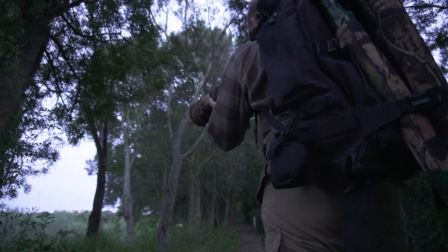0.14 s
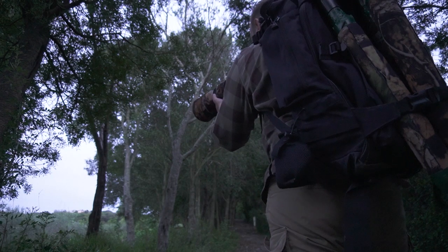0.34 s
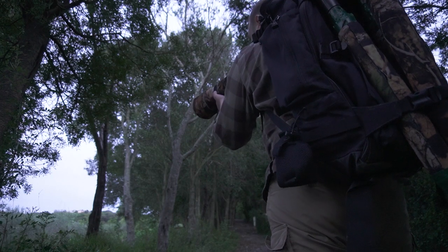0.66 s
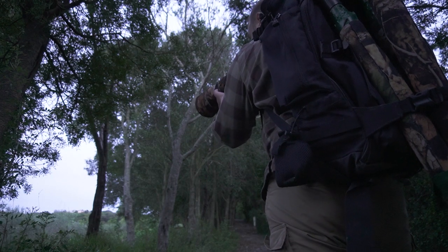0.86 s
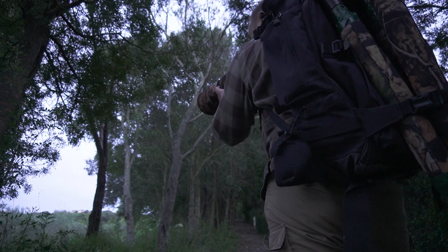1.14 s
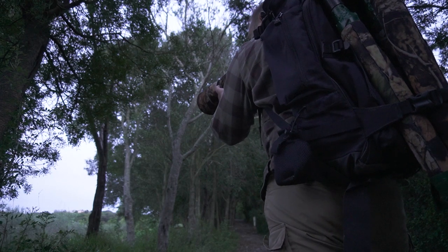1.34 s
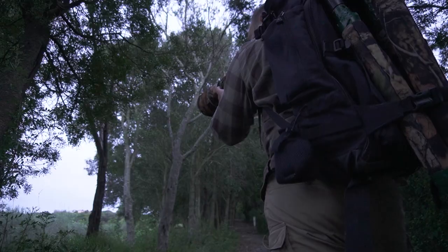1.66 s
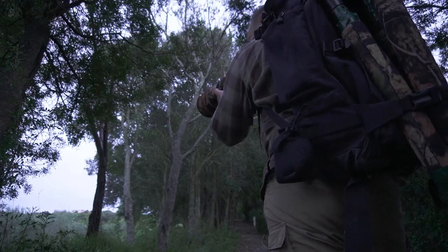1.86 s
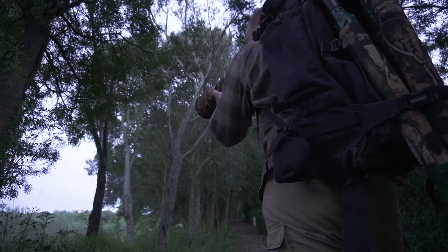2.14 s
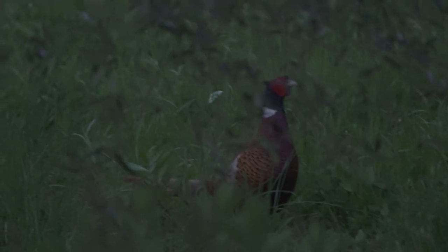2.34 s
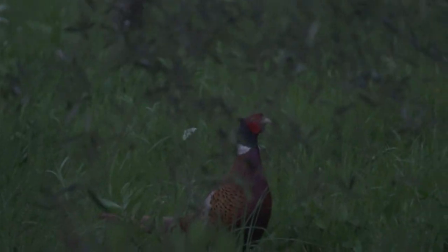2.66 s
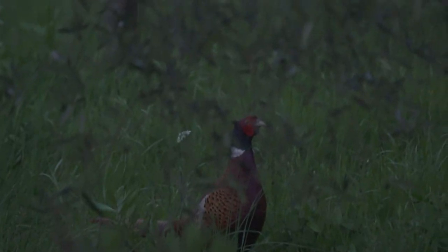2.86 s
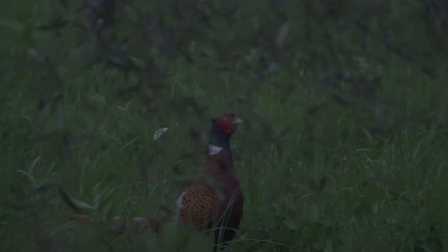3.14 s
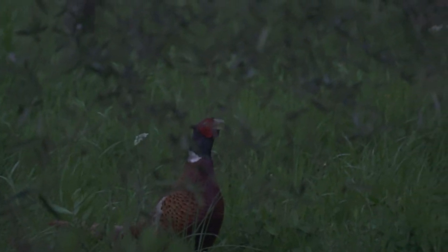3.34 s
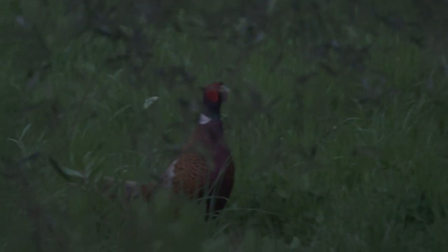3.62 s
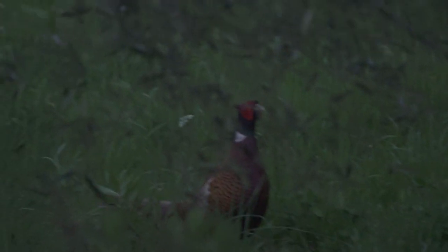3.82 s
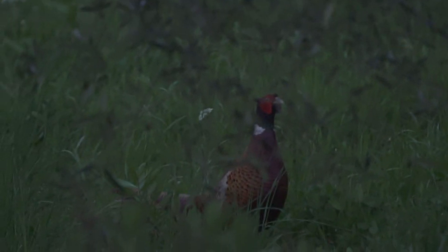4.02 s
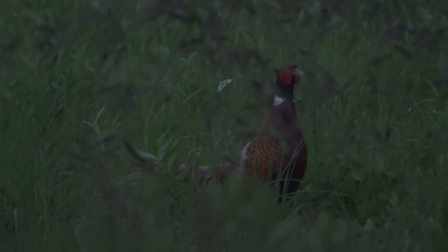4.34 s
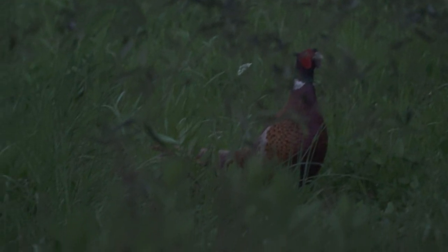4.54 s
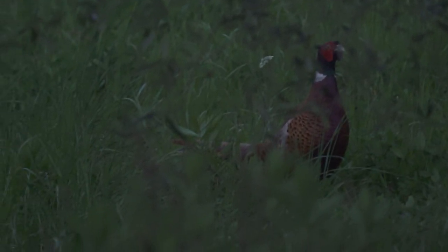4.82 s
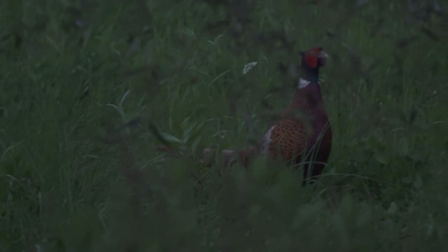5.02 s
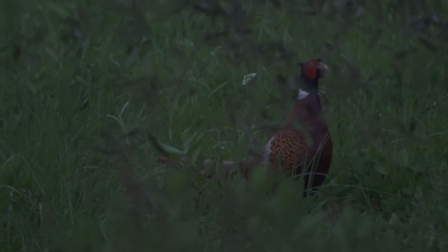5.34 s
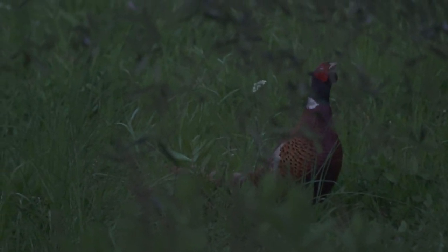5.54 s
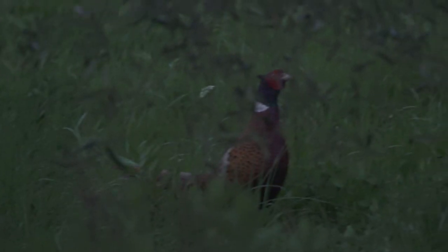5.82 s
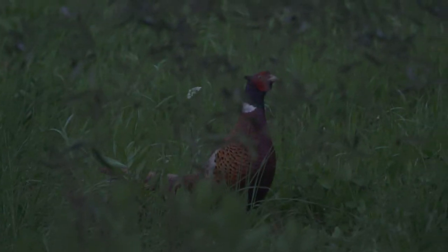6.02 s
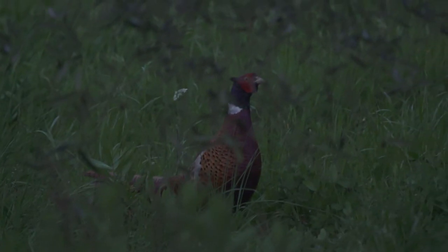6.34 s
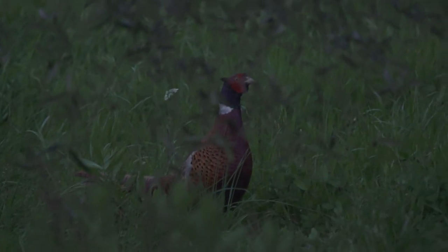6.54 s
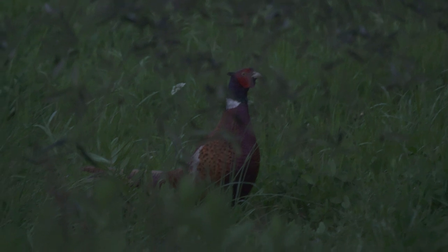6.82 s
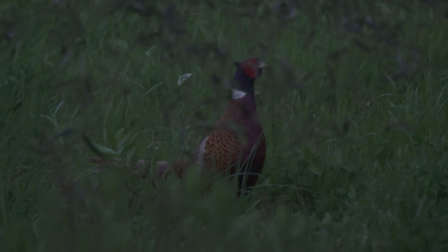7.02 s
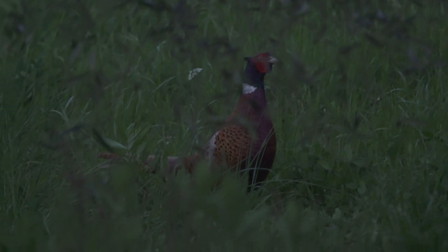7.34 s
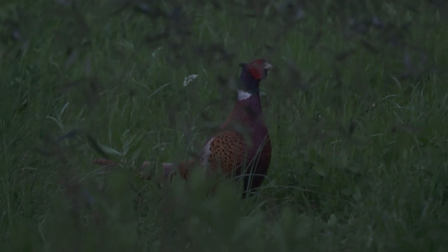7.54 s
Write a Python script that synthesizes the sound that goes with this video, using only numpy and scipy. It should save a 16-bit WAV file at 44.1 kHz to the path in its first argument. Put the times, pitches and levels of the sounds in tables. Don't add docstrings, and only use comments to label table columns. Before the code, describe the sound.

A walker's pack rubs, knocks and clicks close to the microphone for half a second, with a sharp snap and later buckle taps. A pheasant in a meadow gives an abrupt harsh two-beat squawk at about one second, then twice more, each echoing from nearby trees. Far songbirds whistle and flute; a nearer one chatters midway. Quiet air and hiss lie beneath.

```python
import sys
import numpy as np
from scipy import signal
from scipy.fft import rfft, irfft, next_fast_len
from scipy.io import wavfile

SR = 44100
rng = np.random.default_rng(int(sys.argv[2]) if len(sys.argv) > 2 else 0)


def wrap_up_sound(samples):
    columns = np.atleast_2d(samples).T
    tamed = np.clip(columns, -1, 1)
    steps = np.round(tamed * 32767).astype(np.int16)
    wavfile.write(sys.argv[1], SR, steps)


def rack_gain(trim_db):
    fader = np.asarray(trim_db, float)
    return 10 ** (fader / 20)


N = 338247
SCENE_CHANGE_S = 2.335

# freq_hz, level_db (per Hz)
AIR_TONE = [(12, -28.5), (20, 0), (158, -3.5), (222, -4.5), (277, -5), (319, -6), (347, -6), (1330, -14),
            (1710, -19), (1860, -13.5), (2670, -19), (8890, -24.5), (16000, -25.5)]
AIR_DB = -58.5
# time_s, level_db
CHORUS_LEVEL = [(0, -63), (1.499, -66), (2.33, -75.5), (2.34, -95), (3.702, -66), (4.499, -71), (5.5, -66),
                (6.601, -71.5), (7.299, -68), (7.67, -65)]
# freq_hz, t60_s
TREE_DECAY = [(600, 0.59), (1200, 0.52), (2500, 0.39), (4000, 0.29), (5000, .3), (7000, 0.15), (9000, .32),
              (12000, 0.15)]

# start_s, length_s, pitch_hz, level_db
WHISTLES = [(0.85, 0.14, 1290, -70), (0.873, 0.068, 3320, -70), (1.493, 0.065, 1210, -65.5),
            (1.263, 0.1, 2450, -59), (1.43, 0.22, 2910, -71), (1.647, 0.11, 2680, -68),
            (1.701, 0.11, 1746, -65), (2.07, 0.052, 3820, -75), (2.327, 0.022, 3900, -71),
            (3.952, 0.041, 2137, -65.5), (4.098, 0.17, 3170, -75), (4.05, 0.055, 2580, -69),
            (4.191, 0.061, 2100, -67), (4.485, 0.099, 1700, -69), (4.382, 0.036, 2650, -72),
            (4.616, 0.06, 2280, -59), (5.072, 0.21, 2510, -68.5), (5.063, 0.18, 2600, -74),
            (6.03, 0.081, 1333, -67), (6.041, 0.19, 3404, -67.5), (6.354, 0.1, 2026, -65),
            (6.726, 0.25, 3010, -73.5), (6.729, 0.049, 1616, -64), (7.096, 0.031, 3325, -66),
            (7.259, 0.02, 3720, -62.5), (7.283, 0.03, 1600, -77), (7.283, 0.035, 3244, -63),
            (7.56, 0.12, 1800, -70.5)]
# start_s, length_s, start_hz, end_hz, level_db
SLURS = [(1.592, 0.024, 2590, 2150, -61), (1.99, 0.12, 2050, 2000, -68.5), (2.123, 0.13, 3680, 2490, -73),
         (2.16, 0.066, 2050, 1350, -67), (2.3, 0.013, 3380, 3300, -57), (2.306, 0.022, 2980, 1890, -51),
         (4.058, 0.025, 2080, 1830, -67), (6.471, 0.172, 2055, 2100, -72.5), (5.415, .05, 2800, 2300, -65),
         (6.102, 0.15, 2370, 2275, -66.5), (6.196, 0.0266, 3020, 2680, -59),
         (6.236, 0.027, 2784, 2100, -57), (6.677, 0.1, 1720, 2000, -66), (7.492, 0.056, 2850, 3060, -71),
         (7.29, 0.087, 2180, 2280, -70)]
WHISTLE_HUSK_HZ, SLUR_HUSK_HZ_PER_S = 27, 170
# time_s, pitch_hz, level_db
ARCH = [(.875, 1676, -65.5), (.888, 1773, -57.5), (.923, 1753, -57), (.95, 1900, -57), (1.0, 1988, -59.5),
        (1.04, 1900, -58.5), (1.077, 1794, -56.5), (1.115, 1680, -58)]
TRILL_S, TRILL_HZ, TRILL_DEPTH_HZ = .928, 131, 130
# time_s, pitch_hz, level_db
WARBLE = [(1.647, 2490, -64), (1.68, 2300, -63), (1.716, 1880, -71), (1.77, 2107, -66), (1.805, 2360, -57),
          (1.872, 2100, -62), (1.915, 2324, -55), (1.945, 2387, -67), (1.99, 2126, -66)]
# time_s, pitch_hz, level_db
FIGURES = [
    [(2.09, 2720, -64), (2.115, 2780, -61), (2.125, 2700, -64), (2.145, 2617, -52.5), (2.17, 2580, -80),
     (2.195, 2520, -58), (2.225, 2650, -77), (2.25, 2670, -64), (2.3, 2715, -61)],
    [(4.078, 3200, -63), (4.105, 3090, -55.5), (4.128, 2710, -61)],
    [(4.455, 1260, -71), (4.478, 1740, -61), (4.52, 1270, -72)],
    [(4.74, 2550, -69), (4.77, 2280, -63), (4.815, 2060, -62)],
    [(6.83, 2467, -68), (6.9, 2372, -61), (6.965, 2115, -62), (7.03, 2060, -65), (7.1, 2275, -70),
     (7.18, 2246, -65), (7.23, 2140, -62)],
    [(7.225, 2080, -64), (7.265, 1696, -63), (7.33, 1640, -79)],
]
FIGURE_TRILL_HZ = [.1, .1, .1, .1, 110, .1]
FLUTE_ECHO_DB = -5.5

# start_s, start_hz, end_hz, level_db
FLOURISH = [
    (4.576, 4280, 3900, -68),
    (4.61, 4160, 3360, -72),
    (4.63, 3110, 2744, -58),
    (4.65, 3900, 3360, -62),
]
CHIRP_S, CHIRP_GAP_S, SLOWING_S, ANSWER_S = 4.593, .154, .0012, .058
# start_hz, end_hz
FALL_HZ = (3057, 2800)
FALL_DB = [-55.5, -59, -58.5, -62, -58.5, -62, -63.5]
RISE_HZ = 1390
# end_hz, level_db
ANSWERS = [
    (2300, -57),
    (2420, -54.5),
    (2180, -58),
    (2100, -59.5),
    (1980, -62.5),
]

# time_s, level_db
CLOTH_LEVEL = [(0, -55.5), (.135, -53), (.15, -45.5), (.21, -45), (.32, -57.5), (.39, -57), (.51, -61),
               (.8, -63.5), (2.301, -72)]
# freq_hz, level_db (per Hz)
CLOTH_TONE = [(59, -59), (100, -13), (300, -1.5), (576, 0), (1340, -1), (1880, -2.5), (8770, -12.5),
              (15500, -24)]
# start_s, peak_db, ring_hz, tick_db (bright tick against the ring)
CLICKS = [(0.029, -28.5, 5000, -14), (0.052, -34, 2470, -10), (0.073, -34, 905, -9),
          (0.1695, -30, 2700, -2), (0.192, -29, 1500, -5), (0.2214, -37, 5930, 4), (0.254, -41, 2500, -1),
          (.38, -37, 1290, -12), (0.395, -34, 2000, -10), (0.4871, -16, 1690, -23),
          (0.4872, -25.5, 3220, -12), (0.488, -23, 9600, -16), (.4886, -20.5, 5330, -26),
          (.504, -36, 5600, 3), (0.5228, -37.5, 915, 6), (0.524, -37, 7200, -3), (.641, -54, 9000, 0),
          (.681, -49, 6950, -2), (0.7093, -46, 8000, 0), (0.7193, -45, 10000, 9), (0.966, -46, 5400, -2),
          (.973, -53, 6000, -3), (1.085, -49, 5500, -4), (7.392, -53, 4360, -4), (1.749, -43, 2800, -5),
          (1.976, -45.5, 2300, -4), (1.678, -65, 9000, 14), (2.201, -47, 2440, 1),
          (2.3087, -39.5, 906, -4.5), (2.816, -51, 3010, 8.5), (2.968, -45, 3580, -9),
          (3.285, -56, 4000, 5), (4.588, -34.5, 1960, -24), (4.601, -42, 1910, -15), (4.823, -46, 2050, 3),
          (4.9816, -45, 5200, 0), (7.4173, -50, 3500, 7.5), (.4884, -25, 13500, -12),
          (.5232, -44, 12000, -6)]
# start_s, peak_db, pitch_hz, length_cycles
KNOCKS = [(0.1422, -29, 456, 4.7), (0.155, -36, 680, 6.1), (0.1695, -24, 640, 1.7), (0.178, -30, 242, 1.9),
          (.199, -32, 497, 2.5), (.204, -32, 695, 2.6), (0.211, -18, 654, 2.5), (0.221, -31, 1270, 5.5),
          (.16, -40, 535, 14), (0.185, -32, 1370, 3.2), (0.271, -41.5, 343, 2.9)]
# freq_hz, level_db, t60_s
BUCKLE_MODES = [(425, -14, 0.014), (760, -7, 0.025), (1363, -7, 0.019), (1720, 0, 0.013),
                (2100, -2.5, 0.0068), (2715, -13.5, .006), (3520, -11, .006), (4026, -10.5, 0.0094),
                (6070, -22, .004), (7700, -16, 0.0033)]
# start_s, level_db, hardness_db_per_khz, rim_db (rim modes)
TAPS = [
    (.4875, -30.5, -4, .1),
    (0.777, -34, 1.97, -9),
    (0.944, -36, 2.5, 3),
]

# start_hz, end_hz, level_db
SQUEAKS = [
    (4733, 11000, -48.5),
    (3900, 2400, -32.5),
    (5000, 4400, -22.5),
]
# start_s, length_s, effort_db, low_voice_db (against the effort)
SQUAWKS = [
    [(1.118, 0.018, -16.5, -9), (1.141, 0.024, -25.5, -3.5), (1.172, 0.025, -31.5, -1.5),
     (1.19, .016, -23, -7.5), (1.214, 0.005, -29.5, 2.5)],
    [(3.4435, 0.031, -18.5, -15.5), (3.486, 0.011, -32.5, 6.5), (3.506, 0.0016, -21, -29.5),
     (3.517, 0.0043, -24.5, -3), (3.53, 0.027, -38.5, 1)],
    [(5.627, 0.031, -18, -16), (5.664, 0.018, -28.5, 1), (5.693, 0.00297, -23.5, -8.5),
     (5.706, 0.0076, -29.5, -4), (5.722, 0.017, -38.5, -7.5)],
]
FIRST_HZ = [993.5, 996.4, 1012]
LATER_HZ = [965, 967, 967]
LOW_HZ = [1088, 1107, 1098]
LOW_SAG_HZ_PER_S = [1700, 1900, 1900]
# rise_share, rise_s, sag_share_per_s
SCOOP = [(0.057, 0.0068, 0.15), (0.055, .004, 0.76), (0.119, .007, .7)]
OVERTONES = [0.25, 0.2, 0.77, 0.24, 0.48, 0.15, 0.37, 0.49, 0.52, 0.33, 0.56, 0.47]
MIXED_TONES = [(0, 2), (4, -1), (4, 1), (4, 2)]
MIXED_STRENGTH = [
    [0.37, 0.62, 0.29, .25],
    [0.17, 0.38, 0.38, 0.24],
    [0.17, 0.27, .25, .25],
]
FLUTTER_HZ = [184, 208.5, 279.8]
THROB = [0.57, 0.3, 0.33]
UNEVEN = [.2, 0.55, 0.59]
SWELL_DB = [-4, -3.5, -2.5]
SWELL_S = 0.0086
TIRING_DB_PER_S = -130
DULLING_DB_PER_S = -160
# freq_hz, level_db
WINDPIPE = [(500, -39), (820, -21), (1220, -28), (1700, -15.5), (2400, -17.5), (3480, -5), (3950, -5.5),
            (4150, -14), (5150, -5.5), (5550, -31), (6400, -16.5), (7400, -30.5), (8600, -34),
            (15500, -43.5)]
# freq_hz, level_db
BEAK = [
    [(1050, -0.06), (1300, 5.5), (2900, -2.6), (3500, 0.6), (5300, -0.7), (6400, 0.5), (7600, -3),
     (8800, 1.5)],
    [(1050, -1.26), (1300, 4.5), (2900, -2), (3500, 1.5), (5300, 1), (6400, 2.5), (7700, -4), (8800, -4)],
    [(1050, 0), (1300, 6.5), (2900, -1.5), (3500, -0.5), (5300, 2), (6400, 2), (7600, -4), (8800, -.6)],
]
WHEEZE_DB = [-33, -33, -34.5]
WHEEZE_S, WHEEZE_RISE_S, WHEEZE_FALL_S = 0.14, 0.0066, .02
# freq_hz, level_db
WHEEZE_TONE = [(520, -26.5), (700, -6.5), (1250, -16.5), (1700, -3), (6300, -7.5), (7600, -10.5),
               (13000, -18.5), (15800, -32)]
WHEEZE_BANDS_DB, WHEEZE_BAND_HZ = 1.5, 1950
# after_onset_s, level_db
PUSH = [
    [(0, -5.5), (.02, -2), (.042, -0.5), (.064, -11), (.088, -1), (.105, -7.5), (.14, -16)],
    [(0, -9), (.028, 5), (.05, -0.5), (.07, 3), (.095, -3.5), (.115, -15.5), (.14, -15)],
    [(0, -3.5), (.02, 2.5), (.045, -0.5), (.065, -4), (.09, -2), (.115, -16), (.14, -14)],
]
ECHO_DB = [-9, -6, -4.5]
FAR_DB = [-17.5, -18, -17.5]


def evened(x):
    return x / np.sqrt(np.mean(x ** 2) + 1e-20)


def read(points, hz):
    f, value = np.transpose(points)
    return np.interp(np.log(hz + 1), np.log(f + 1), value)


def add(mix, s, sound):
    part = mix[round(s * SR):][:len(sound)]
    part += sound[:len(part)]


def wander(length, hz):
    b, a = signal.butter(2, hz, fs=SR)
    return evened(signal.lfilter(b, a, rng.standard_normal(length + 4000))[4000:])


def coloured(x, points):
    size = next_fast_len(len(x))
    gain = rack_gain(read(points, np.fft.rfftfreq(size, 1 / SR)))
    return irfft(rfft(x, size) * gain, size)[:len(x)]


def fade(t, length, rise, fall):
    return np.clip(t / rise, 0, 1) * np.clip((length - t) / fall, 0, 1)


def trees(x, slower=1.0, far_db=-22):
    taps = np.zeros(SR)
    at = np.arange(300, SR - 20, 20) + rng.integers(0, 20, (SR - 301) // 20)
    taps[at] = rng.choice([-1., 1.], len(at))
    hz, t, z = signal.stft(taps, SR, nperseg=256)
    fall_db = -60 * t / (slower * read(TREE_DECAY, hz)[:, None])
    near_and_far = rack_gain(fall_db) + rack_gain(far_db + 0.36 * fall_db)
    tail = signal.istft(z * near_and_far, SR, nperseg=256)[1]
    return signal.fftconvolve(x, tail / np.linalg.norm(tail))[:N]


def note(length, start_hz, end_hz, level_db, husky_hz, rise=0.012, fall=0.0033):
    t = np.arange(round(length * SR)) / SR
    hz = start_hz + (end_hz - start_hz) * t / length + husky_hz * wander(15000, 130)[:len(t)]
    tone = np.sin(2 * np.pi * np.cumsum(hz) / SR)
    return rack_gain(level_db) * np.sqrt(2) * tone * fade(t, length, rise, fall)


def air():
    hiss = evened(coloured(rng.standard_normal(N), AIR_TONE))
    return rack_gain(AIR_DB + 0.17 * wander(N, 2.5)) * hiss


def chorus(count=420):
    out = np.zeros(N)
    s, db = np.transpose(CHORUS_LEVEL)
    for when, length, pitch, bend in rng.random((count, 4)):
        hz = 1500 + 1900 * pitch ** 1.5
        whistle = note(.03 + .06 * length, hz, hz * (.8 + .35 * bend), 0, 90)
        add(out, when * (N / SR - .2), whistle)
    return evened(trees(out, 1.0)) * rack_gain(np.interp(np.arange(N) / SR, s, db))


def flute(phrase, husky_hz=25, trill_hz=0):
    s, hz, db = np.transpose(phrase)
    t = np.arange(s[0], s[-1], 1 / SR)
    trill = trill_hz * (t > TRILL_S) * np.sin(2 * np.pi * TRILL_HZ * (t - TRILL_S))
    turns = np.cumsum(np.interp(t, s, hz) + trill + husky_hz * wander(len(t), 120)) / SR
    tone = rack_gain(np.interp(t, s, db)) * np.sqrt(2) * np.sin(2 * np.pi * turns)
    return s[0], tone * fade(t - s[0], s[-1] - s[0], .006, 0.0044)


def chirp(start_hz, end_hz, level_db, length=0.037, settle_s=0.0106, drop_hz=0):
    t = np.arange(round(length * SR)) / SR
    glide = end_hz + (start_hz - end_hz) * np.exp(-t / settle_s) - drop_hz * (t / length) ** 4
    turns = np.cumsum(glide + 75 * wander(len(t), 200)) / SR
    second_tone = np.sin(2 * np.pi * 1.1 * turns + 1.4 * wander(len(t), 370.7))
    tone = np.sin(2 * np.pi * turns) + 0.68 * np.exp(-t / 0.04) * second_tone
    return rack_gain(level_db) * np.sqrt(2) * tone * fade(t, length, .003, .014)


def chatter():
    out = np.zeros(N)
    for s, *row in FLOURISH:
        add(out, s, chirp(*row))
    k = np.arange(len(FALL_DB))
    starts = CHIRP_S + CHIRP_GAP_S * k + SLOWING_S * k * k
    for s, db in zip(starts, FALL_DB):
        add(out, s, chirp(*FALL_HZ, db))
    for s, row in zip(starts[1:], ANSWERS):
        add(out, s + ANSWER_S, chirp(RISE_HZ, *row, length=.045, settle_s=.005, drop_hz=1100))
    return rack_gain(-0.5) * out + rack_gain(-4) * trees(out, 1.1)


def songbirds():
    before, after, near = np.zeros(N), np.zeros(N), np.zeros(N)
    for s, length, hz, db in WHISTLES:
        side = before if s < SCENE_CHANGE_S - .01 else after
        add(side, s, note(length, hz, hz, db, WHISTLE_HUSK_HZ))
    for s, length, *row in SLURS:
        side = before if s < SCENE_CHANGE_S else after
        add(side, s, note(length, *row, SLUR_HUSK_HZ_PER_S * length))
    add(near, *flute(ARCH, 12, TRILL_DEPTH_HZ))
    add(near, *flute(WARBLE, 6.9))
    for figure, trill_hz in zip(FIGURES, FIGURE_TRILL_HZ):
        add(near, *flute(figure, 28, trill_hz))
    gate = np.clip((SCENE_CHANGE_S - np.arange(N) / SR) / 0.011, 0, 1)
    before = gate * (before + rack_gain(-5.0) * trees(before, 1.5))
    after = after + rack_gain(-5.0) * trees(after, 1.47)
    near = near + rack_gain(FLUTE_ECHO_DB) * trees(near, 1.2)
    return before + after + near + chatter()


def cloth():
    s, db = np.transpose(CLOTH_LEVEL)
    size = rack_gain(1.4 * np.minimum(rng.exponential(1, N), 5))
    snaps = size * (rng.random(N) < 2500 / SR) * rng.standard_normal(N)
    rub = coloured(evened(snaps) + 1.4 * rng.standard_normal(N), CLOTH_TONE)
    level_db = np.interp(np.arange(N) / SR, s, db + 3.0, right=-90)
    return evened(rub) * rack_gain(level_db + 1.5 * wander(N, 47))


def buckle():
    out, t = np.zeros(N), np.arange(2000) / SR
    for s, level_db, hard, rim_db in TAPS:
        for hz, db, t60 in BUCKLE_MODES:
            mode_db = level_db + db + hard * hz / 1000 + rim_db * (3000 < hz < 5000)
            add(out, s, rack_gain(mode_db - 60 * t / t60) * np.sin(2 * np.pi * hz * t))
    return out


def pack():
    out, t = np.zeros(N), np.arange(600) / SR
    bright = signal.butter(1, [2500, 9500], "band", fs=SR)
    for s, peak_db, hz, tick_db in CLICKS:
        ring = np.sin(2 * np.pi * hz * t) * np.exp(-t / (0.00022 + 0.71 / hz))
        tick = signal.lfilter(*bright, rng.standard_normal(600)) * 1.46 * np.exp(-t / 0.0005)
        add(out, s, rack_gain(peak_db) * (1.2 * ring + rack_gain(tick_db) * tick))
    out = signal.sosfilt(signal.butter(2, 350, "high", fs=SR, output="sos"), out)
    for s, peak_db, hz, cycles in KNOCKS:
        u = np.arange(round(cycles / hz * SR)) / SR
        swell = np.sin(np.pi * (u * hz / cycles) ** 0.72) ** 2
        add(out, s, rack_gain(peak_db) * np.sin(2 * np.pi * hz * u) * swell)
    out = out + buckle()
    return out + rack_gain(-30) * trees(out, 0.26)


def wheeze(level_db, push):
    t = np.arange(round(WHEEZE_S * SR)) / SR
    rush = rng.standard_normal(8000)[:len(t)] * rack_gain(2.2 * wander(8000, 160)[:len(t)])
    hz = np.fft.rfftfreq(len(t), 1 / SR)
    bands_db = WHEEZE_BANDS_DB * np.cos(2 * np.pi * (hz - 2800) / WHEEZE_BAND_HZ)
    rush = evened(coloured(irfft(rfft(rush) * rack_gain(bands_db), len(t)), WHEEZE_TONE))
    push_db = np.interp(t, *np.transpose(push))
    return rack_gain(level_db + push_db) * rush * fade(t, WHEEZE_S, WHEEZE_RISE_S, WHEEZE_FALL_S)


def beat(s, length, effort_db, hz, low_db, low_hz, first, c, under=0.68):
    depth, jitter = .35, .005
    rasp = np.clip(.38 + .04 * (-16 - effort_db), .38, .8)
    t = np.arange(round((length + 0.0075) * SR)) / SR
    rise, rise_s, sag = SCOOP[c]
    pitch = hz * (1 - sag * t - rise * first * np.exp(-(t / rise_s) ** 2))
    turns = np.cumsum(pitch * (1 + jitter * wander(2600, 140)[:len(t)])) / SR
    flutter = np.cumsum(FLUTTER_HZ[c] * (1 + .08 * wander(2600, 50)[:len(t)])) / SR
    lag = rng.random((15, 2))
    low_waver = (.03 - .018 * first) * wander(2600, 80)[:len(t)]
    low_turns = np.cumsum(low_hz * (1 - 1.3 * t + low_waver)) / SR

    stack = np.zeros(len(t))
    for (m, n), share in zip(MIXED_TONES, MIXED_STRENGTH[c]):
        stack += share * np.cos(2 * np.pi * (m * turns + n * low_turns))
    stack = 0.86 * stack * np.clip(t / 0.002 + 1 - first, 0, 1)
    for k, strength in enumerate(OVERTONES, start=2):
        throb = 1 + depth * np.cos(2 * np.pi * (flutter + lag[k, 0]))
        partial = throb * np.cos(2 * np.pi * k * turns)
        difference = np.cos(2 * np.pi * (k * turns - flutter + lag[k, 1]))
        below = under * (0.32 + 0.76 * first) * difference
        late = 1 if k == 4 else np.clip(t / .005 + 1 - first, 0, 1)
        halves = 0
        for n in (1, 3, 5):
            line = k * turns - n / 2 * flutter + n * lag[k].sum()
            halves = halves + np.cos(2 * np.pi * line) / np.sqrt(n)
        stack = stack + strength * late * (partial + below + UNEVEN[c] * halves)

    puffs = rng.standard_normal(2600)[:len(t)] * (1 + 0.31 * np.cos(2 * np.pi * flutter))
    puffs = puffs * np.clip(t / 0.0047 + 1 - first, 0, 1)
    shape = fade(t, t[-1], .0015 if first else .003, .004) * rack_gain(TIRING_DB_PER_S * t)
    shape = shape * (1 + THROB[c] * first * np.cos(2 * np.pi * flutter))
    shape = shape * rack_gain(SWELL_DB[c] * first * np.exp(-t / SWELL_S))
    voice = shape * (evened(stack) + rasp * evened(puffs))
    high = coloured(np.pad(voice, 200), WINDPIPE)[200:]
    low = np.sin(2 * np.pi * low_turns) * (1 + .3 * wander(2600, 90)[:len(t)])
    low = np.pad(low * fade(t, t[-1], .0047, .004), (0, 200))
    return rack_gain(effort_db) * (evened(high) + rack_gain(low_db) * low)


def pheasant():
    out = np.zeros(N)
    for c, (beats, (start_hz, end_hz, level_db)) in enumerate(zip(SQUAWKS, SQUEAKS)):
        call, start = np.zeros(N), beats[0][0]
        squeak = note(0.0037, start_hz, end_hz, level_db, 30, rise=.004, fall=0.0011)
        add(call, start - .0045, squeak)
        for k, (s, length, effort_db, low_db) in enumerate(beats):
            hz = LATER_HZ[c] if k else FIRST_HZ[c]
            low_hz = LOW_HZ[c] - LOW_SAG_HZ_PER_S[c] * (s - start)
            sound = beat(s, length, effort_db, hz, low_db, low_hz, k == 0, c)
            dulling = [(9000, 0.006), (16000, DULLING_DB_PER_S * (s - start))]
            add(call, s, coloured(sound, dulling))
        add(call, start, wheeze(WHEEZE_DB[c], PUSH[c]))
        call = coloured(call, BEAK[c])
        out += call + rack_gain(ECHO_DB[c]) * trees(call, far_db=FAR_DB[c])
    return out


def scene():
    return (air() + chorus() + songbirds() + cloth() + pack() + pheasant())[None]


def top_cut(x):
    return signal.sosfilt(signal.butter(12, 16660, fs=SR, output="sos"), x)


def record(dry):
    edge = signal.firwin(1501, 15740, window=("kaiser", 7), fs=SR)
    mix = signal.oaconvolve(dry, edge[None], "same")
    return top_cut(mix)


dry = scene()
out = record(dry)
wrap_up_sound(out)
```